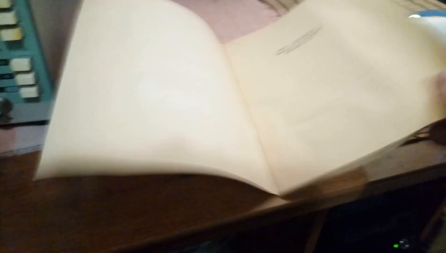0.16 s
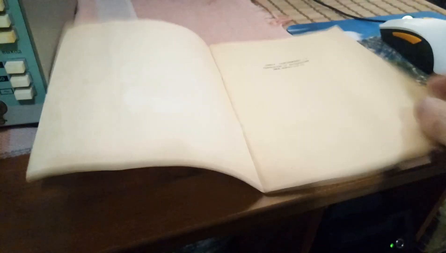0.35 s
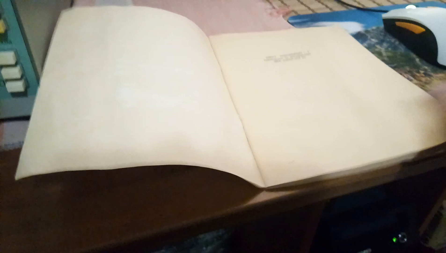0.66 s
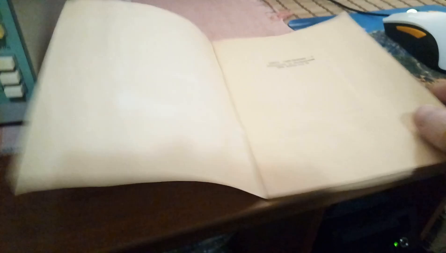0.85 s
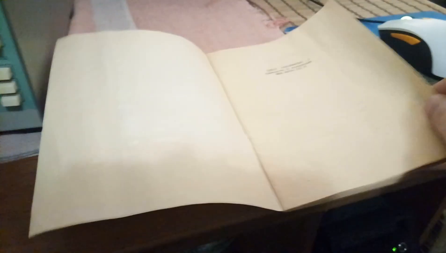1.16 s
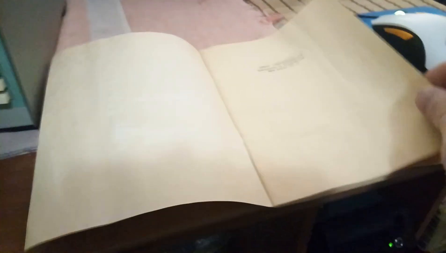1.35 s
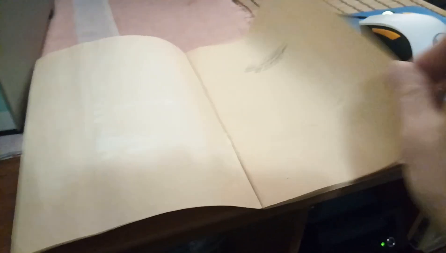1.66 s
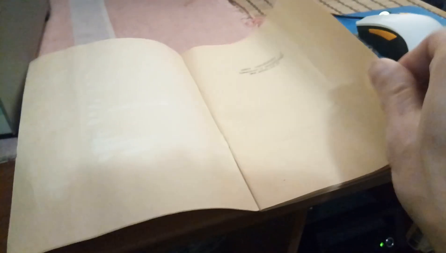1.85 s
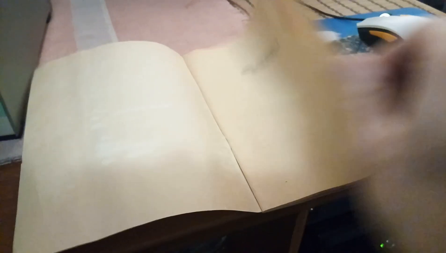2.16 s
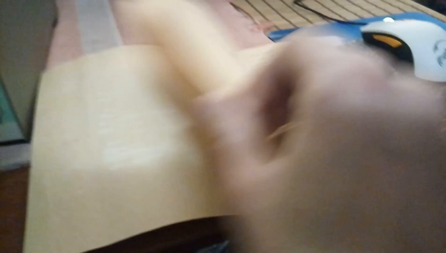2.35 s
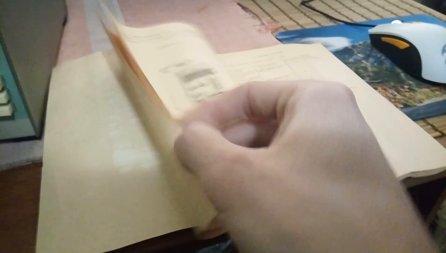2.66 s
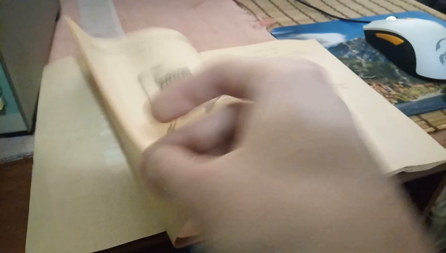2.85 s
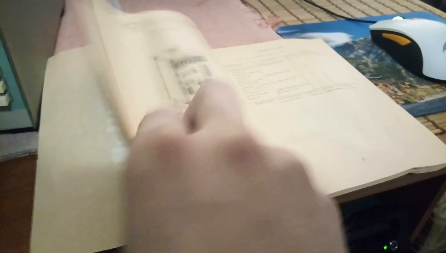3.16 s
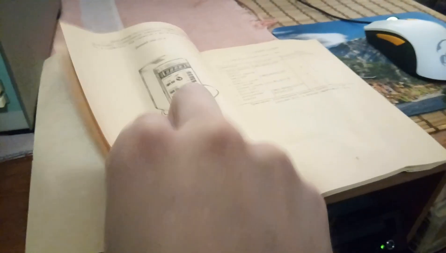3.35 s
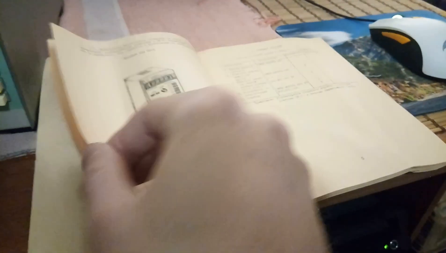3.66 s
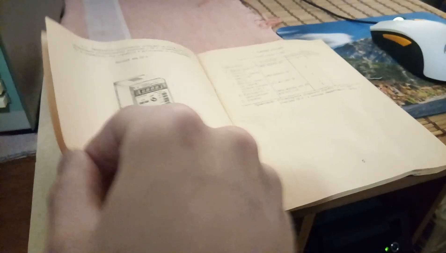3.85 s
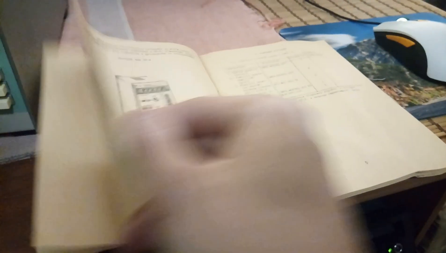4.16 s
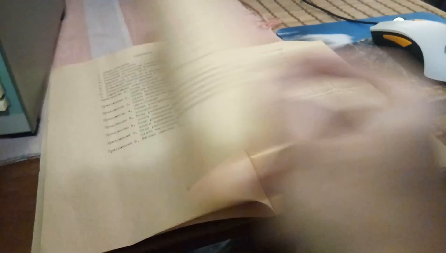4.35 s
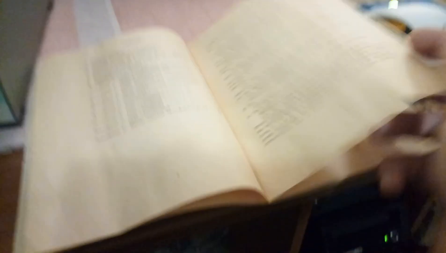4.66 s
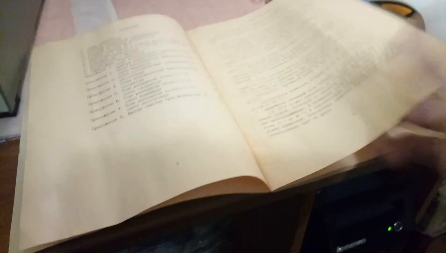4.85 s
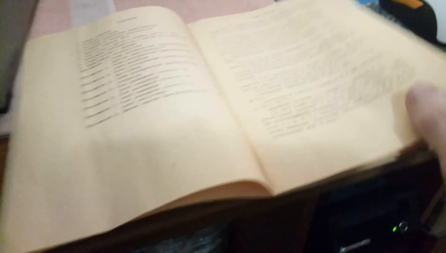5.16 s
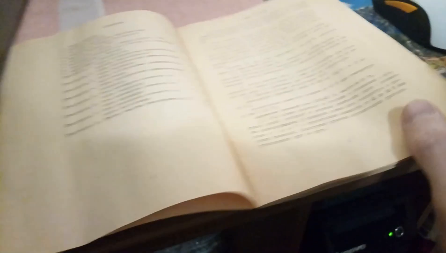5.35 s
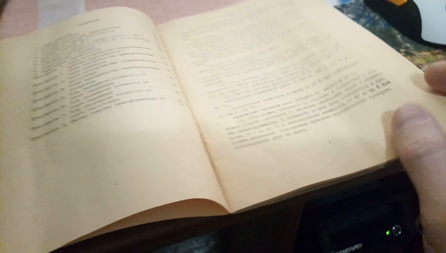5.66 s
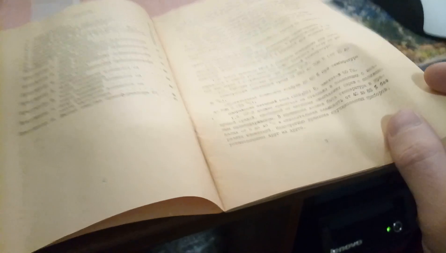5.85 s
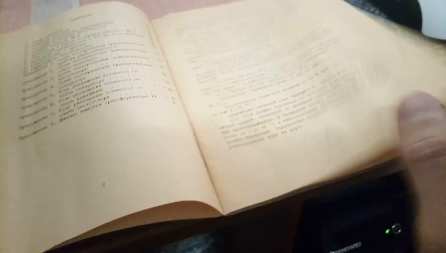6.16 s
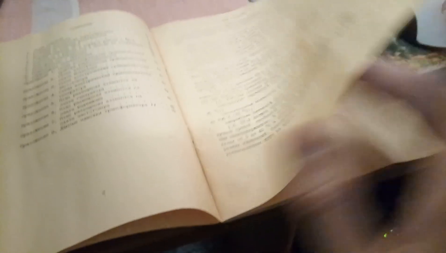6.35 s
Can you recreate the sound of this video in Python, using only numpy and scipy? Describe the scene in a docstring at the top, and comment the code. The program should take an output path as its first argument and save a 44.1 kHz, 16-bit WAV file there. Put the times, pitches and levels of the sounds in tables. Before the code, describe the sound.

Close, crackly leafing through an aged paper booklet: gritty slides, sharp creasing snaps, soft floppy sheet movement, then quieter handling and faint hiss.

```python
"""A hand leafs through an old paper booklet on a desk, close to a pair of small microphones.
Skin and sheets slide as gritty, coloured noise; the flapping sheet is darker noise over low thumps.
Creases snap and buckles pop as short noise bursts with a thud; squeaks, hums and a whine are wavering sines.
A small room answers with sparse, fast-dying echoes over a faint steady hiss."""
import sys
import numpy as np
from scipy import signal
from scipy.fft import rfft, irfft
from scipy.io import wavfile
from scipy.ndimage import uniform_filter1d

SR = 44100
rng = np.random.default_rng(int(sys.argv[2]) if len(sys.argv) > 2 else 0)


def wav_out(sig):
    """Save sig, one row per channel (or a flat mono array), as 16-bit PCM at SR to the path in sys.argv[1]."""
    wavfile.write(sys.argv[1], SR, np.round(np.clip(np.atleast_2d(sig).T, -1, 1) * 32767).astype(np.int16))


N = 286208

# steady floor colour, relative: pitch_hz, level_db (per Hz)
HISS_COLOUR = [(18, -10), (60, -4), (200, 8), (384, 8), (1280, 3), (2500, -3), (6210, 0.6), (8080, -6),
               (9970, -1.1), (16000, 3)]
HISS_DB = -65
# how fast the room dies in each band: pitch_hz, t60_s
ROOM_DECAY = [(200, 0.16), (1000, 0.085), (4000, 0.091), (12000, 0.074)]
# colour of the microphones: pitch_hz, level_db
MICROPHONE_COLOUR = [(30, -14), (65, -11), (110, -2), (6600, 0), (8000, -8), (10300, -1), (12000, -4),
                     (13800, -8), (14600, 1), (16000, 2)]
BAND_LIMIT_HZ = 15700
# where the hand is: time_s, left_delay_samples (negative = left hears it first)
HAND_PLACE = [(0, 5.5), (1.4, 4), (1.7, 3.5), (2.2, -3), (2.7, -8.5), (3.2, -10), (3.8, -9), (4.25, -6.5),
              (4.7, -0.5), (5.2, 3), (5.8, 3), (6.49, 0)]
# likeness of the rustle at the two microphones: pitch_hz, likeness (0 to 1)
SIDE_LIKENESS = [(100, 0.51), (1000, 0.74), (3000, 0.22), (6000, 0.13), (12000, 0.11)]
# balance of the rustle across the spectrum: pitch_hz, left_over_right_db
SIDE_BALANCE = [(60, -36), (125, -11), (250, -16), (1000, -1.5), (4000, 2.5), (12000, 7.5)]
# squeaks, low hums and a thin whine: start_s, length_s, pitch_hz, glide_hz_per_s, level_db,
# waver_share (of the pitch), fading_share (of the length)
SQUEAKS = [(.34, .23, 1245, 5, -60, .039, .3), (4.855, .115, 1335, -800, -51, .0035, .95),
           (5.475, .14, 222, -40, -62, .01, .9), (5.64, .22, 218, 21, -55.5, .014, .6),
           (5.52, .35, 1255, 5, -66, .031, .3), (5.35, .4, 10080, 1.5, -72, .0004, .8)]
# creases snapping through (high, short) and buckles popping (low, longer): start_s, level_db, centre_hz,
# width_octaves (7 dB down this far from the centre), rise_ms, t60_s (of the main fall),
# left_over_right_db, thud_db (relative to the crack)
SNAPS = [(0.27, -35.5, 372, 1.35, 2.1, 0.08, -8, -8), (0.41, -44, 195, 1.8, 4.9, 0.046, -12, -18),
         (0.437, -23, 1010, 1.1, 0.96, 0.008, 9, -45), (0.445, -27.5, 5840, 1.3, 1.6, 0.012, -5, -35),
         (0.906, -31.5, 5700, 2.1, 1.8, 0.017, -4, -27.5), (1.109, -48.5, 312, 1.6, 2.4, 0.019, -11, -18),
         (1.207, -42, 260, 1.8, 2.2, 0.081, -4, -11), (1.247, -37.5, 1090, 1, 1.5, 0.014, 8, -27),
         (1.351, -28.5, 1780, 1.6, 3.2, 0.016, 0, -38), (1.393, -24, 3880, 2.4, 2.1, 0.015, 6, -19.5),
         (1.593, -38, 520, 1.8, 2.1, 0.11, -1.1, -23), (1.731, -44.5, 2020, 1.5, 1.3, 0.022, 8, -16.5),
         (1.7718, -12, 1500, 1.4, 1.5, 0.012, 3, -22), (1.913, -42, 573, 2.1, 2.7, 0.033, -3, -6),
         (2.014, -41.5, 590, 0.73, 2.1, 0.059, 0.1, -18), (2.058, -15, 2350, 1.1, 1.93, 0.0077, 2.5, -25),
         (2.189, -35, 1200, 1.3, 2.9, 0.02, -4.5, -25), (2.194, -33, 2500, 2.6, 1.2, 0.008, 3, -40),
         (2.2035, -25, 4760, 2.2, 1.2, 0.006, -2.5, -29), (2.2137, -9, 3900, 1.25, 1.24, 0.0099, 4.5, -23),
         (2.351, -11, 3600, 1.2, 0.87, 0.0087, 0, -48), (2.511, -39, 940, 0.85, 1.1, 0.061, -8, -30),
         (2.569, -45, 665, 0.79, 2.6, 0.039, -7, -13), (2.646, -29.5, 1300, 1.1, 1.15, 0.049, -5, -29),
         (2.662, -13, 3370, 0.95, 2.65, 0.006, 0, -36.5), (2.729, -20, 1360, 1.9, 1.8, 0.015, 0.0, -63),
         (2.764, -24.5, 2340, 3.6, 1.5, 0.017, -3, -56), (2.9985, -25, 6000, 1.5, 0.8, 0.005, 0.1, -60),
         (3.196, -48.5, 705, 1.1, 3.8, 0.033, -12, -17), (3.964, -53.5, 434, 1.6, 6.1, 0.069, -5, -32),
         (4.119, -35, 1840, 1.4, 1.57, 0.013, -2.5, -31), (4.221, -42, 3850, 0.63, 1.1, 0.021, 8, -42),
         (4.274, -35, 1150, 1.3, 1.9, 0.02, 0, -31.5), (4.36, -38, 780, 1.9, 5.1, 0.05, 0.1, -48),
         (4.384, -21, 1400, 2.1, 1.97, 0.012, 9.5, -71), (4.49, -27, 1150, 0.95, 2.06, 0.024, 0.5, -28),
         (4.615, -33, 1770, 0.57, 1.6, 0.015, 3, -30), (4.648, -31.5, 1600, 1.2, 2.5, 0.037, 4, -51),
         (4.6755, -27, 2100, 0.85, 1.2, 0.018, 5, -30), (4.7285, -26, 1630, 0.83, 2.1, 0.018, -4, -24),
         (4.735, -22, 1530, 1.17, 1.1, 0.021, 1, -34.5), (4.786, -18.5, 2070, 1.3, 2.1, 0.024, 1, -30.5),
         (4.798, -31, 1830, 1.7, 1.2, 0.026, -0.5, -31), (4.937, -44, 2140, 0.84, 2.4, 0.013, 1.5, -31),
         (5.29, -45, 616, 2.3, 1.6, 0.02, 5.5, -25), (5.876, -29.5, 1250, 1.2, 0.6, 0.018, -6, -12),
         (5.887, -34, 700, 1.2, 2.3, 0.016, -9, -35), (5.953, -41, 1130, 1.2, 1.6, 0.011, 0, -9),
         (6.023, -51, 1600, 0.98, 3.9, 0.021, 8, -30), (6.178, -46, 810, 0.41, 1.8, 0.024, 2, -17),
         (6.224, -32.5, 1450, 0.96, 1.6, 0.021, 5.5, -19), (6.34, -42, 1530, 0.5, 1.9, 0.021, 1, -51),
         (6.457, -33, 2470, 1, 2.7, 0.012, -4, -15)]
# air pushed by a snap or pop: centre_hz, width_octaves (as above), t60_s (of the main fall)
THUD = (260, 1.05, .05)
# sheet stirring between strokes: time_s, flapping_db, thumping_db
SHEET_STIRRING = [(0.0, -65, -72), (0.36, -57, -70), (0.56, -68, -77), (0.85, -69, -75), (1.17, -56, -71),
                  (1.81, -59, -73), (1.99, -56, -67), (2.62, -53, -70), (2.98, -61, -77), (3.34, -59, -76),
                  (4.19, -69, -79), (4.57, -53, -68), (4.75, -54, -70), (4.99, -70, -77), (5.31, -71, -75),
                  (5.75, -64, -70), (6.02, -67, -75), (6.49, -63, -75)]
# colours of the flapping and of the thumps below it, relative: pitch_hz, level_db (per Hz)
FLAP_COLOUR = [(100, -25), (300, -15), (600, 0), (1300, -0.5), (2500, -4.5), (5000, -14), (9000, -18)]
THUMP_COLOUR = [(30, -20), (60, -14), (110, -3), (200, 1.5), (320, -1.5), (600, -12), (1500, -40)]
THUMP_UNDER_FLAP_DB = -15
# colour of sliding skin and paper, relative: pitch_hz, level_db (per Hz)
SLIDE_COLOUR = [(150, -25), (400, -24), (900, -11), (1600, 6.5), (3000, 9), (5000, 10.5), (9000, 10.5),
                (16000, 1.5)]
# strokes and slips of skin and paper: full_strength_s, level_db, rise_s (per 20 dB), hold_s,
# fall_s (per 20 dB), brightness_db_per_octave, left_over_right_db, flapping_db
STROKES = [(0.0, -44.2, 0.494, 0.01, 0.589, 2.0, -3.8, -57.4),
           (0.169, -38.5, 0.081, 0.022, 0.037, 4.8, -3.7, -53.3),
           (0.231, -43.6, 0.095, 0.038, 0.073, 3.8, -3.7, -54.1),
           (0.411, -33.9, 0.118, 0.011, 0.148, 2.7, -2.5, -46.5),
           (0.484, -43.5, 0.023, 0.014, 0.029, -1.1, -3.2, -72.0),
           (0.654, -47.2, 0.01, 0.029, 0.053, 2.0, -2.1, -67.6),
           (0.864, -46.5, 0.283, 0.005, 0.054, -0.0, -1.2, -61.7),
           (0.89, -42.5, 0.028, 0.026, 0.082, -0.5, -3.9, -55.2),
           (1.005, -34.3, 0.077, 0.015, 0.214, 1.1, -1.7, -49.1),
           (1.122, -35.9, 0.127, 0.094, 0.053, -0.2, -2.5, -55.2),
           (1.343, -28.1, 0.032, 0.05, 0.214, 0.8, -1.6, -47.4),
           (1.42, -45.2, 0.247, 0.014, 0.21, 2.1, 0.2, -52.5),
           (1.588, -32.4, 0.056, 0.02, 0.021, -0.9, 1.0, -50.6),
           (1.657, -42.1, 0.006, 0.006, 0.014, -2.7, -2.3, -57.9),
           (1.772, -36.6, 0.006, 0.007, 0.073, -2.6, -5.4, -41.7),
           (1.798, -49.3, 0.136, 0.009, 0.019, -3.5, 0.2, -51.0),
           (1.909, -31.3, 0.026, 0.006, 0.039, -0.2, 1.0, -47.8),
           (2.012, -34.5, 0.009, 0.058, 0.037, -1.1, 1.0, -48.5),
           (2.1, -44.4, 0.3, 0.011, 0.123, -1.8, -4.0, -58.1),
           (2.21, -33.2, 0.022, 0.052, 0.026, -2.9, -4.2, -43.4),
           (2.273, -27.4, 0.035, 0.058, 0.022, 0.0, 0.1, -46.2),
           (2.349, -32.1, 0.01, 0.004, 0.117, -3.0, -5.7, -50.7),
           (2.5, -29.1, 0.073, 0.01, 0.317, -0.6, -0.9, -48.0),
           (2.536, -26.1, 0.082, 0.021, 0.033, -0.8, -0.6, -46.1),
           (2.662, -31.8, 0.012, 0.004, 0.033, -4.5, 0.6, -40.4),
           (2.731, -29.8, 0.073, 0.049, 0.067, -1.8, -1.8, -46.6),
           (2.822, -33.5, 0.01, 0.03, 0.145, 0.4, -0.3, -53.7),
           (3.0, -40.8, 0.131, 0.018, 0.169, -1.4, -0.6, -60.2),
           (3.07, -33.5, 0.055, 0.028, 0.141, -1.1, -2.1, -53.1),
           (3.194, -31.7, 0.024, 0.026, 0.08, -0.4, -4.5, -50.9),
           (3.241, -39.9, 0.049, 0.032, 0.319, -1.8, -4.0, -54.9),
           (3.337, -32.7, 0.017, 0.102, 0.038, -0.2, -3.2, -57.2),
           (3.443, -42.2, 0.291, 0.022, 0.243, -1.4, -3.4, -59.6),
           (3.577, -39.6, 0.164, 0.006, 0.086, -1.1, -0.1, -57.1),
           (3.612, -35.6, 0.022, 0.079, 0.054, -1.8, -0.2, -51.9),
           (3.834, -40.6, 0.078, 0.079, 0.055, 1.6, 0.4, -57.4),
           (3.9, -41.8, 0.102, 0.072, 0.088, 1.2, -1.6, -55.8),
           (4.044, -48.4, 0.034, 0.025, 0.025, 1.9, 0.1, -72.0),
           (4.105, -36.2, 0.042, 0.016, 0.051, 1.8, -0.5, -54.3),
           (4.225, -50.1, 0.422, 0.056, 0.126, -1.1, -1.3, -63.5),
           (4.344, -30.5, 0.004, 0.04, 0.042, 0.8, -0.6, -44.3),
           (4.458, -47.5, 0.01, 0.01, 0.148, -3.2, -3.4, -72.0),
           (4.492, -42.6, 0.151, 0.008, 0.061, -2.7, -3.6, -49.5),
           (4.577, -48.1, 0.117, 0.009, 0.334, -4.1, -3.6, -72.0),
           (4.65, -39.6, 0.027, 0.029, 0.03, -5.0, -2.6, -47.6),
           (4.721, -40.0, 0.017, 0.012, 0.082, -3.5, -2.5, -40.8),
           (4.788, -36.1, 0.03, 0.003, 0.053, -3.1, -3.2, -42.3),
           (4.91, -50.1, 0.217, 0.039, 0.098, -1.3, -3.4, -61.1),
           (4.986, -43.9, 0.059, 0.028, 0.127, 0.0, -1.4, -64.2),
           (5.092, -50.9, 0.074, 0.04, 0.047, -1.5, -0.6, -67.0),
           (5.241, -48.3, 0.239, 0.012, 0.253, 2.2, -1.5, -63.3),
           (5.493, -54.7, 0.046, 0.012, 0.441, 1.4, -3.0, -61.9),
           (5.747, -47.5, 0.04, 0.022, 0.072, 0.8, -2.4, -62.9),
           (5.835, -45.2, 0.058, 0.046, 0.054, -1.4, -3.4, -54.5),
           (5.962, -47.8, 0.07, 0.005, 0.072, -2.1, -3.0, -52.5),
           (6.091, -40.2, 0.028, 0.04, 0.045, -0.7, -3.2, -63.2),
           (6.174, -54.1, 0.062, 0.028, 0.027, -0.0, -4.4, -54.5),
           (6.247, -46.5, 0.01, 0.059, 0.045, -0.1, -1.6, -60.5),
           (6.34, -45.1, 0.022, 0.063, 0.019, -1.8, 0.3, -72.0),
           (6.463, -40.6, 0.368, 0.017, 0.156, -1.8, 1.0, -56.5)]


def gain_of(db):
    """Decibels to gain."""
    return 10 ** (np.asarray(db) / 20)


def evened(x):
    """Scales to rms 1."""
    return x / np.sqrt(np.mean(x ** 2) + 1e-20)


def read(points, hz):
    """Reads a spectrum on a log-frequency axis."""
    f, value = np.transpose(points)
    return np.interp(np.log(hz + 1), np.log(f + 1), value)


def curve(rows, column, t):
    """Reads one column of a time table."""
    columns = np.transpose(rows)
    return np.interp(t, columns[0], columns[column])


def painted(x, colour):
    """Filters a sound of N samples by a spectrum table."""
    return irfft(rfft(x) * gain_of(read(colour, np.fft.rfftfreq(N, 1 / SR))), N)


def add(mix, s, sound):
    """Mixes a sound in at time s, cut off at the end of the mix."""
    part = mix[..., round(s * SR):][..., :sound.shape[-1]]
    part += sound[..., :part.shape[-1]]


def drift(shape, size):
    """Smooth random wander of rms 1; size = smoothing length along each axis."""
    x = rng.standard_normal(shape)
    for axis, n in enumerate(size):
        for _ in range(2):
            x = uniform_filter1d(x, n, axis=axis)
    return evened(x)


def hiss():
    """The steady floor: coloured noise, unrelated left and right."""
    return gain_of(HISS_DB) * evened(painted(rng.standard_normal((2, N)), HISS_COLOUR))


def room(x):
    """Echoes as sparse taps of random sign, each band dying at its own speed, other taps per side."""
    taps = np.zeros((2, SR // 2))
    at = np.arange(100, SR // 2 - 20, 20)
    at = at + rng.integers(0, 20, (2, len(at)))
    np.put_along_axis(taps, at, rng.choice([-1., 1.], at.shape), 1)
    hz, t, z = signal.stft(taps, SR, nperseg=256)
    decay = gain_of(-60 * t / read(ROOM_DECAY, hz)[:, None])
    tail = signal.istft(z * decay, SR, nperseg=256)[1]
    tail /= np.linalg.norm(tail[0])
    return signal.fftconvolve(x.mean(0)[None], tail, axes=1)[:, :N]


def squeaks():
    """Stick-slip tones, slightly unsteady in pitch and level."""
    out = np.zeros(N)
    for s, length, hz, glide, db, waver, fading in SQUEAKS:
        t = np.arange(0, length, 1 / SR)
        pitch = (hz + glide * t) * (1 + waver * drift(N, size=[200])[:len(t)])
        tone = np.sin(2 * np.pi * np.cumsum(pitch) / SR)
        tone *= signal.windows.tukey(len(t), np.clip(fading, 0, 1))
        level = gain_of(db + 1.65 * drift(N, size=[400])[:len(t)])
        add(out, s, np.sqrt(2) * level * tone)
    return out


def burst(noise, hz, width, rise_ms, t60):
    """A ragged burst around one pitch: a quick rise, a steep fall and a faint rattle after."""
    t = np.arange(4096) / SR
    octave = np.log2(np.fft.rfftfreq(4096, 1 / SR) + 1)
    band = gain_of(-7 * ((octave - np.log2(hz)) / width) ** 2)
    pair = [noise[0], 0.51 * noise[0] + 0.95 * noise[1]]  # partly alike left and right
    x = irfft(rfft(pair) * band)
    x /= np.sqrt(uniform_filter1d(x ** 2, size=250))  # a firm outline
    after = np.maximum(t - rise_ms / 1000, 0)
    x *= np.minimum(1000 * t / rise_ms, 1) ** 2
    fall, rattle = gain_of(-60 * after / t60), 0.04 * gain_of(-15 * after / t60)
    return x * (fall + rattle)


def snaps():
    """Each crease or buckle lets go with a crack at its own pitch and a low thud."""
    out = np.zeros((2, N + 99))
    thud_hz, thud_width, thud_t60 = THUD
    noises = rng.standard_normal((len(SNAPS), 2, 4096))
    for (s, db, hz, width, rise_ms, t60, pan_db, thud_db), noise in zip(SNAPS, noises):
        thud = burst(noise, thud_hz, thud_width, 4.97, thud_t60)
        sound = burst(noise, hz, width, rise_ms, t60) + gain_of(thud_db) * thud
        left_delay_s = curve(HAND_PLACE, 1, s) / SR
        add(out[0], s + left_delay_s, sound[0] * gain_of(db + pan_db / 2))
        add(out[1], s, sound[1] * gain_of(db - pan_db / 2))
    return out[:, :N]


def grit(level, grains_db, flicker_db, ticks_db):
    """Two unrelated noises that share one envelope: fibres catch in grains, clumps and single ticks."""
    grains = grains_db * drift(N, size=[12]) + flicker_db * drift(N, size=[300])
    tick_level = gain_of(2.75 * np.minimum(rng.exponential(1, N), 4) + ticks_db)
    ticks = tick_level * (rng.random(N) < 60 / SR)  # about 60 ticks a second
    ticks = signal.lfilter([1], [1, -np.exp(-1 / (0.0004 * SR))], ticks)  # each dies with a 0.4 ms constant
    return level * evened(gain_of(grains) + ticks) * rng.standard_normal((2, N))


def heard(pair, spectrum, patchy_db, size, tilt=0):
    """Colours a noise pair and places it at the hand: delay, balance and likeness at two microphones."""
    hz, t, (a, b) = signal.stft(pair, SR, nperseg=size, noverlap=3 * size // 4)
    tilt_now = np.interp(t, np.arange(N) / SR, tilt + np.zeros(N))  # dB per octave around 6 kHz
    tilting = np.outer(np.log2((hz + 99) / 6000), tilt_now)
    colour = gain_of(read(spectrum, hz)[:, None] + tilting)
    colour /= np.sqrt(np.mean(colour ** 2, 0))  # the tilt leaves the loudness alone
    colour = colour * gain_of(patchy_db * drift(a.shape, size=[4, 12]))
    same = np.clip(read(SIDE_LIKENESS, hz), 0, 1)[:, None]
    late = np.exp(-2j * np.pi * np.outer(hz, curve(HAND_PLACE, 1, t)) / SR)
    lean = gain_of(read(SIDE_BALANCE, hz)[:, None] / 2)
    left = a * late * lean
    right = (same * a + np.sqrt(1 - same ** 2) * b) / lean
    z = np.array([left, right]) * colour
    return signal.istft(z, SR, nperseg=size, noverlap=3 * size // 4)[1][:, :N]


def flapping(stroke):
    """The whole sheet buckles and pushes air: a dark, lumpy rustle over low thumps."""
    t = np.arange(N) / SR
    flap_level = np.hypot(gain_of(curve(SHEET_STIRRING, 1, t)), stroke)
    thump_level = np.hypot(gain_of(curve(SHEET_STIRRING, 2, t)), gain_of(THUMP_UNDER_FLAP_DB) * stroke)
    flap = grit(flap_level, grains_db=-0.5, flicker_db=1.5, ticks_db=-17)
    thump = grit(thump_level, grains_db=0.7, flicker_db=3, ticks_db=-30)
    flap = heard(flap, FLAP_COLOUR, patchy_db=1.5, size=512)
    return flap + heard(thump, THUMP_COLOUR, patchy_db=1.5, size=1024)


def strokes():
    """Each stroke rises, holds and falls; gives sliding gain per side, brightness and flapping gain."""
    s, db, rise, hold, fall, bright, pan_db, flap_db = np.transpose(STROKES)[:, :, None]
    t = np.arange(N) / SR
    before, after = np.maximum(s - t, 0), np.maximum(t - s - abs(hold), 0)
    shape = gain_of(-20 * (before / rise + after / fall)) ** 2  # as power
    power = shape * gain_of(db) ** 2 + 1e-20
    left, right = (power * gain_of(pan_db)).sum(0), (power / gain_of(pan_db)).sum(0)
    brightness = (power * bright).sum(0) / power.sum(0)  # the loudest stroke counts most
    flap = np.sqrt((shape * gain_of(flap_db) ** 2).sum(0))
    return np.sqrt([left, right]), brightness, flap


def sliding(level, brightness):
    """Steady strokes and sudden slips of skin on paper drive the same gritty hiss."""
    fibres = grit(1, grains_db=-0.5, flicker_db=1.2, ticks_db=-9)
    return level * heard(fibres, SLIDE_COLOUR, patchy_db=2.0, size=256, tilt=brightness)


def scene():
    """The paper sounds, their room and the floor."""
    slide, brightness, flap = strokes()
    rustle = sliding(slide, brightness) + flapping(flap) + squeaks()
    cracks = snaps()
    echoes = room(gain_of(-9) * rustle + gain_of(-2) * cracks)
    return rustle + cracks + echoes + hiss()


def record(dry):
    """The microphones thin the lowest bass and have dips in the treble; then the band limit."""
    coloured = painted(dry, MICROPHONE_COLOUR)
    lowpass = signal.firwin(255, BAND_LIMIT_HZ, window=("kaiser", 9), fs=SR)
    return signal.oaconvolve(coloured, lowpass[None], "same")


dry = scene()
out = record(dry)
wav_out(out)
```